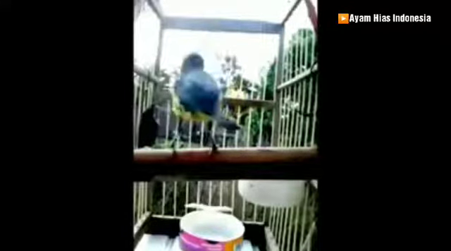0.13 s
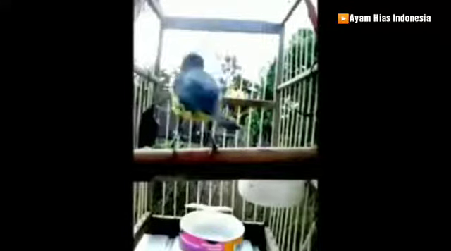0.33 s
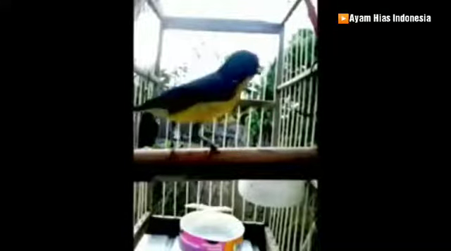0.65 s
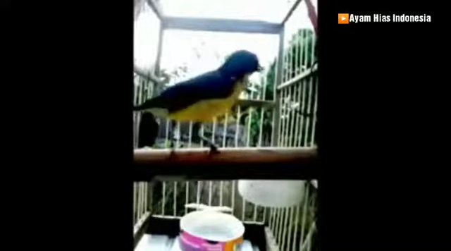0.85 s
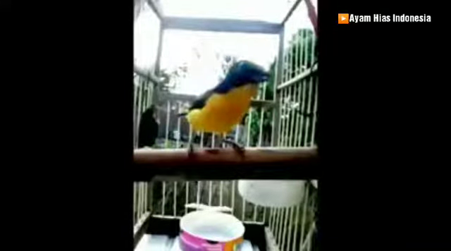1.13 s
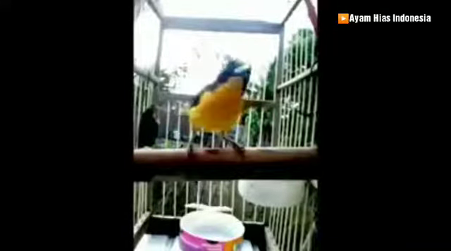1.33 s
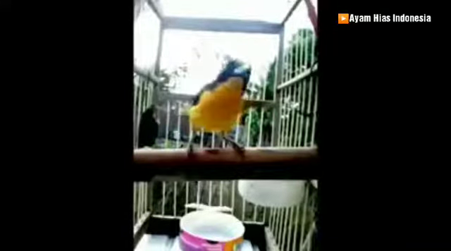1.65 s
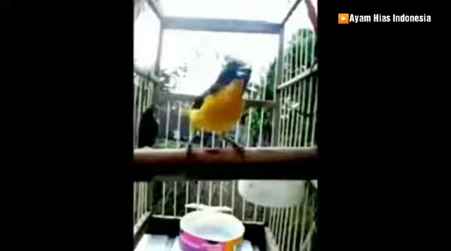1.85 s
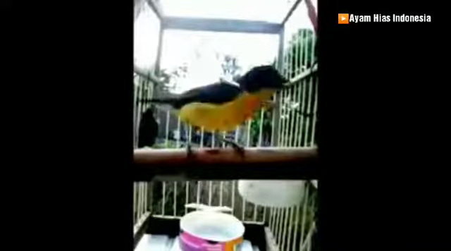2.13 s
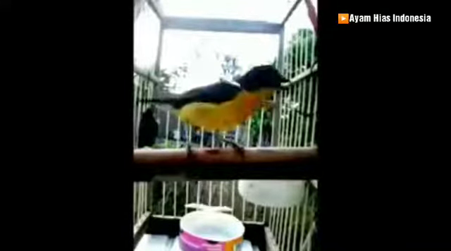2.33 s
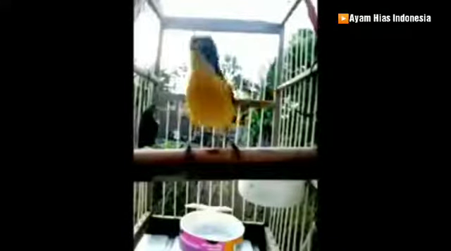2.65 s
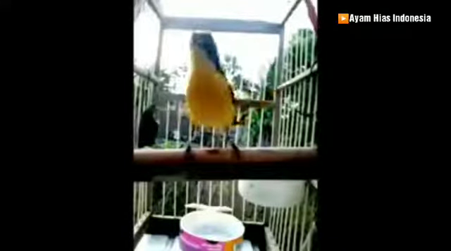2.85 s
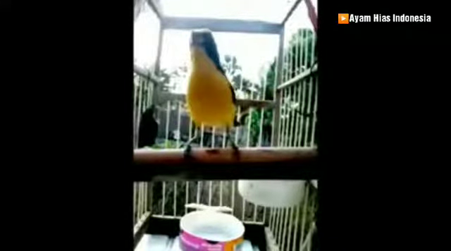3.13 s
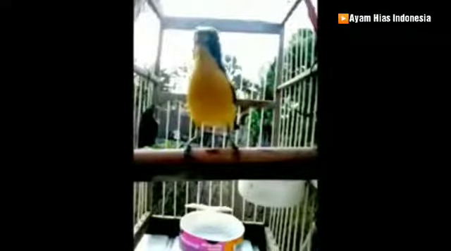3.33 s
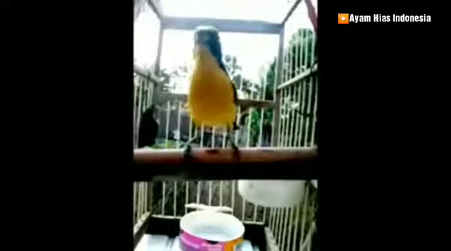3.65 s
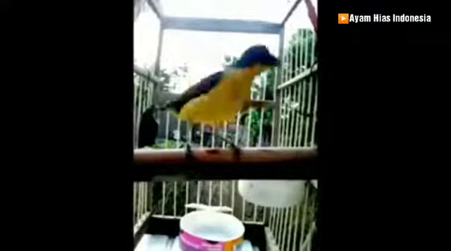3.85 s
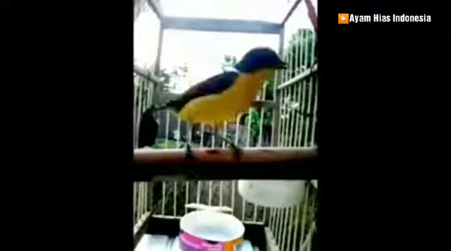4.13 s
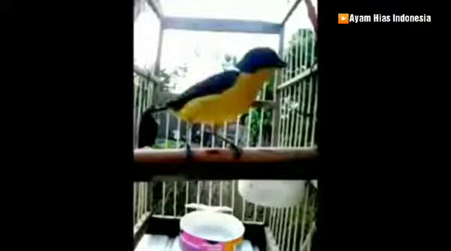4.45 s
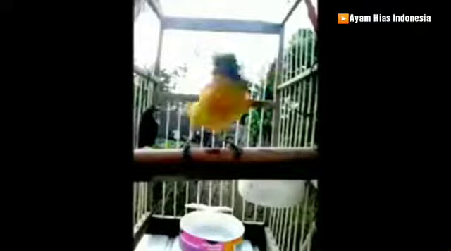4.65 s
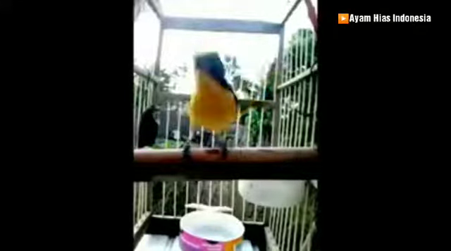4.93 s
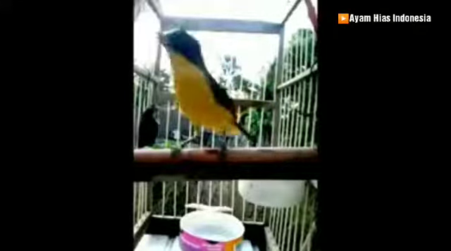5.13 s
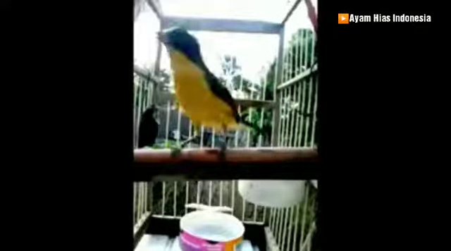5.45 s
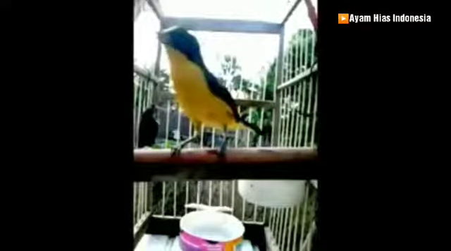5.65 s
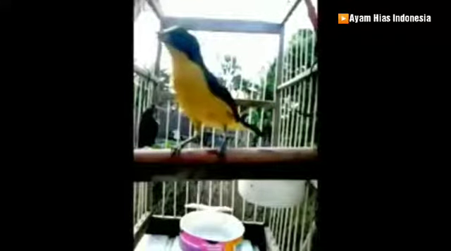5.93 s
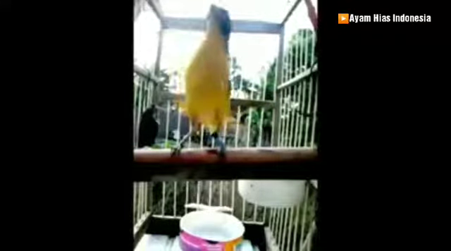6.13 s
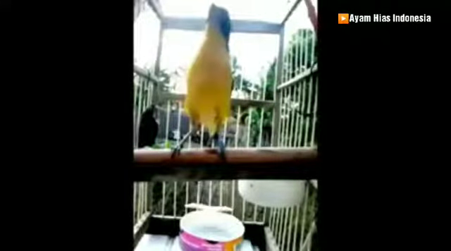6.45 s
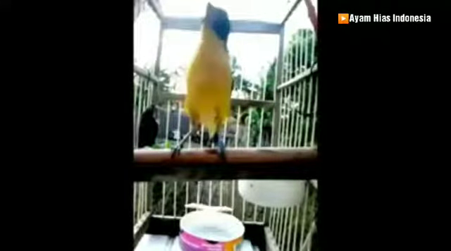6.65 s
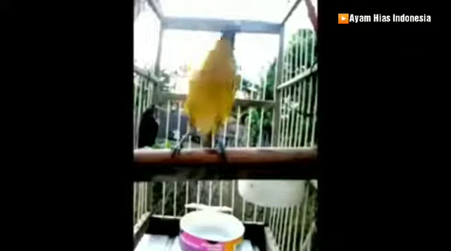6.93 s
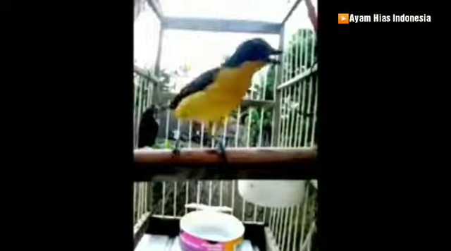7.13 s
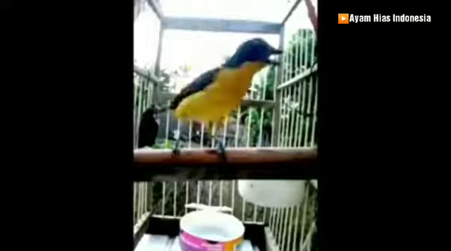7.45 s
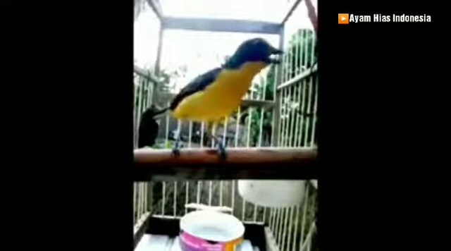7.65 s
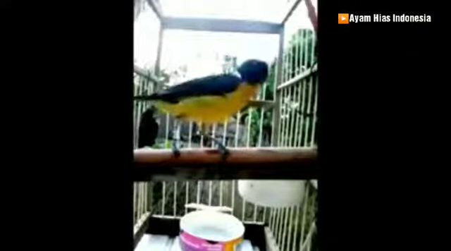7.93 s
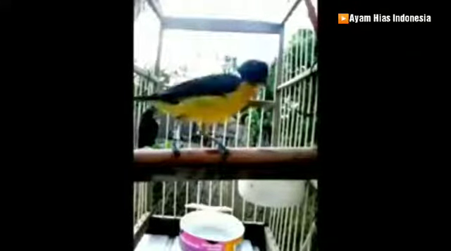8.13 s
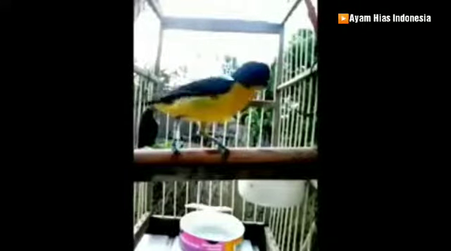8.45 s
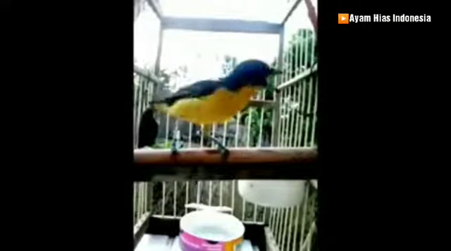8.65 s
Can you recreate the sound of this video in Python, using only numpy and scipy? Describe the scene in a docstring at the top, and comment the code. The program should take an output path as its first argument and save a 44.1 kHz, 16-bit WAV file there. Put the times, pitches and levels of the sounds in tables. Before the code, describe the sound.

A small songbird sings in a cage, close to the microphone, in a quiet yard. Four quick, bright chirps open the first half second. Three longer arched whistles with snapping edges follow at about 0.8, 1.3 and 2.1 seconds. Buzzy, pulsing churrs come from 2.5 to 3 seconds, then six nasal rising calls with whistled tips until 4.2, and a short rough warble. From 4.7 to 6.5 seconds the bird repeats a high, sharply peaked note in a fast chain. A brief twitter turns into a rapid, thin trill until 7.2 seconds. From there to about 8.8 seconds come harsh rasps, high fluttering buzzes and a couple of soft clucks. The cage and nearby walls add a short echo. Behind the song there is only very faint outdoor air and a few barely audible low bumps, the clearest near 7.8 seconds.

```python
'''Caged songbird, close up

A small songbird sings on its perch, close to the microphone, in a quiet yard. Chirps and slurred
whistles lead to nasal rising calls, a chain of peaked notes, a trill and harsh rasps. The two sides
of its syrinx sound alone or together, in near sines or with the overtones of slapping membranes.
The cage and nearby walls add a short echo; faint air and three low bumps lie behind.'''
import sys
import numpy as np
from scipy import signal
from scipy.fft import rfft, irfft
from scipy.io import wavfile
from scipy.ndimage import uniform_filter1d, minimum_filter1d

SR = 44100
rng = np.random.default_rng(int(sys.argv[2]) if len(sys.argv) > 2 else 0)


def generate_wav(sig):
    """Save sig (samples, or channels by samples) to the path in sys.argv[1] as 16-bit PCM at SR."""
    pcm = np.round(np.clip(np.atleast_2d(sig).T, -1, 1) * 32767).astype(np.int16)
    wavfile.write(sys.argv[1], SR, pcm)


N = 387198
TIME = np.arange(N) / SR
CUTOFF_HZ = 15700

# opening chirps from the perch: (time [s], length [s], from [Hz], to [Hz], level [dB])
SCOOP_CHIRPS = [(-.068, 0.087, 5430, 5100, -0.5), (0.115, 0.092, 5420, 5290, -1),
                (0.324, 0.097, 5220, 5370, 0), (0.464, 0.082, 5274, 5203, 0.5)]
# their upper voice: (share of length, pitch ratio, level [dB])
SCOOP_UPPER_SHAPE = [(0, 1, -11), (.13, 1.14, -7.5), (.3, 1.04, -7.5), (.55, .97, -10), (.85, 1.01, -5),
                     (1, 1.04, -15)]
# their lower voice: (share of length, pitch ratio, harmonics 1, 2, 3 [dB], roughness)
SCOOP_LOWER_SHAPE = [(-.03, .67, -27.5, -46, -54.5, 0.1), (.1, .65, -26, -48, -48, 0.07),
                     (.27, .555, -35, -22, -36.5, .05), (.44, .56, -27, -16.5, -44.5, .06),
                     (.68, .665, -22.5, -57.5, -45, .05), (1, .78, -26.5, -30.5, -63.5, .1)]

def scoops():
    """Two-voiced chirps, both sides of the syrinx at once: the clear notes, then the rich ones."""
    upper = [note(SCOOP_UPPER_SHAPE, *row) for row in SCOOP_CHIRPS]
    lower = [note(SCOOP_LOWER_SHAPE, *row) for row in SCOOP_CHIRPS]
    return upper, lower


# long arched whistles: (time [s], length [s], top [Hz], tone level [dB], snap level [dB])
ARCHED_WHISTLES = [(.822, .238, 3365, 1, 1), (1.299, .236, 3420, .5, 3), (2.088, .27, 3315, -2, -4)]
# a pure tone between two harsh snaps: (share of length, harmonics 1, 2, 3 [dB], roughness)
ARCH_SHAPE = [(0, -42, -40.5, -28, .55), (.06, -41.5, -13, -33, .42), (.13, -32.5, -12, -47.5, .33),
              (0.218, -21, -20, -39.5, .12), (.32, -15.5, -38.5, -51.5, .03), (.57, -11, -44, -45.5, 0.04),
              (.82, -12.5, -44.5, -52.5, .02), (.9, -14, -51, -61.5, 0.17), (.945, -30, -14.5, -46, 0.46),
              (0.999, -39.5, -29.5, -39, 0.29)]

def arch(start, length, top_hz, tone_db, snap_db):
    """The pitch snaps up, bows and snaps down; the fundamental carries the tone, overtones the snaps."""
    up_s, down_s, snap_depth, bow_depth = .021, .008, .6, .03
    u = np.linspace(0, 1, 120)
    share, *columns = np.transpose(ARCH_SHAPE)
    first, second, third, rough = [np.interp(u, np.sort(share), c) for c in columns]
    snaps = np.exp(-u * length / up_s) + np.exp(-((1 - u) * length / down_s) ** 2 / 2)
    rough *= np.tanh(snaps / .04)  # the held tone stays pure
    hz = top_hz * (1 - snap_depth * snaps - bow_depth * (2 * u - 1) ** 2)
    levels = first + tone_db, second + snap_db, third + snap_db
    return np.column_stack([start + u * length, hz, *levels, rough])


# nasal rising calls: (time [s], rise [s], from [Hz], to [Hz], early level [dB], late level [dB],
# tip length [s], tip pitch [Hz], tip level [dB])
RISING_CALLS = [(3.054, .17, 1438, 2296, -1.5, 7.5, 0.031, 3060, -4),
                (3.324, 0.068, 1644, 2204, -1, 0, 0.056, 3074, 1),
                (3.502, 0.048, 1662, 2206, 2.5, -7, 0.055, 2890, -2.5),
                (3.669, 0.082, 1820, 2176, -1.5, -1, 0.087, 2792, -1),
                (3.892, 0.057, 1744, 2230, -3, -1.5, 0.065, 2930, 0),
                (4.078, 0.067, 1580, 2296, -4, -3.5, 0.062, 2796, -3.5)]
# the rise, then the tip: (share of length, pitch ratio, harmonics 1, 2, 3 [dB], roughness)
RISE_SHAPE = [(0, 1, -37, -36, -56, .15), (.25, 1, -35, -23, -39, .03), (.65, 1, -35, -22, -38, .09),
              (1, 1, -40, -31, -47, .18)]
TIP_SHAPE = [(.15, .94, -25, -53, -44, 0.11), (.42, 0.97, -13, -32.5, -47, 0),
             (.72, .92, -21, -40, -50.5, .04), (1, .85, -41, -32.5, -37.5, 0.35)]

def riser(start, rise_s, from_hz, to_hz, early_db, late_db, tip_s, tip_hz, tip_db):
    """A nasal glide runs straight on into its whistled tip."""
    swell_db = early_db + (late_db - early_db) * np.array(RISE_SHAPE)[:, :1]
    rise = note(RISE_SHAPE, start, rise_s, from_hz, to_hz, swell_db)
    tip = note(TIP_SHAPE, start + rise_s, tip_s, tip_hz, tip_hz, tip_db)
    return np.vstack([rise, tip])


# the chain of peaked notes: (time [s], peak time [s], climb [s], fall [s], hook [Hz], dip [Hz],
# peak [Hz], end [Hz], hook [dB], mid-climb [dB], top of climb [dB], fall [dB])
PEAKED_NOTES = [(4.721, 4.786, 0.023, .036, 3825, 2990, 6140, 3630, -24.5, -14.5, -2, -8.5),
                (4.874, 4.95, 0.042, 0.042, 3636, 3530, 6400, 4195, -21, -9, -8, -9.5),
                (5.014, 5.071, 0.039, 0.039, 3755, 3485, 6260, 3670, -20, -7.5, -5.5, -7.5),
                (5.14, 5.206, 0.033, 0.037, 3840, 3380, 6620, 3830, -16.5, -12, -21, -8),
                (5.288, 5.362, 0.053, 0.029, 3700, 3220, 6350, 3555, -18, -8.5, -8.5, -8.5),
                (5.445, 5.521, .05, .027, 3750, 2940, 5960, 3950, -20, -14.5, -26, -8),
                (5.603, 5.674, 0.063, 0.027, 3430, 3257, 5880, 3446, -15, -9.5, -3, -9),
                (5.784, 5.845, .032, 0.034, 3752, 3640, 6060, 3925, -17.5, -17.5, 0.5, -11.5),
                (5.964, 6.034, 0.053, 0.038, 3646, 3042, 5680, 3080, -13.5, -11, -11.5, -9),
                (6.12, 6.199, 0.042, 0.034, 3810, 3265, 6060, 3600, -17, -6.5, -8, -10.5),
                (6.363, 6.452, 0.057, 0.036, 3510, 3167, 5600, 4230, -17, -16, -10, -10)]
# how the throat favours the pitches they sweep through: (frequency [Hz], gain [dB])
PEAKED_RESONANCES = [(3200, 1), (4000, 4), (4700, -4.5), (5400, 3), (6000, -4.5), (6700, -5)]

def peaked_note(start, peak_s, climb_s, fall_s, hook_hz, dip_hz, peak_hz, end_hz,
                hook_db, mid_db, top_db, fall_db):
    """After a soft hook and a dip the pitch climbs ever faster, then falls as the note fades."""
    hook_s, hook_edge_db, dip_db, fade_db = .0091, -10.5, -29.5, 12.5
    u = np.linspace(0, 1, 20)
    hook = [(start, hook_hz * .88, hook_db + hook_edge_db),
            (start + hook_s, hook_hz, hook_db),
            (start + 2 * hook_s, (hook_hz + dip_hz) / 2, hook_db + hook_edge_db)]
    climb_db = np.interp(u, [0, .7, 1], [dip_db, mid_db, top_db])
    climb = [peak_s - climb_s * (1 - u), dip_hz + (peak_hz - dip_hz) * u ** 2.1, climb_db]
    fall = [peak_s + fall_s * u, peak_hz + (end_hz - peak_hz) * u ** .9, fall_db - fade_db * u ** 3]
    s, hz, db = np.hstack([climb, fall])
    return np.vstack([hook, np.column_stack([s, hz, db + at_hz(PEAKED_RESONANCES, hz)])])


# clear downward slurs: (time [s], length [s], from [Hz], to [Hz], level [dB])
DOWN_SLURS = [(4.968, .02, 5350, 4490, -15), (5.103, 0.015, 5400, 4940, -16),
              (5.374, 0.017, 5500, 4160, -14), (5.53, 0.014, 5100, 4600, -32),
              (5.689, 0.017, 5550, 4700, -5), (5.861, .016, 5664, 5220, -4.5),
              (6.053, .022, 5450, 4230, -14.5), (6.211, 0.031, 5410, 4540, -8.5),
              (6.242, 0.0038, 5240, 5280, -3.5), (7.973, 0.075, 5920, 4120, -16.5)]

def slurs(fade_db):
    """Straight, fading falls, most from the other side of the syrinx as a peaked note comes down."""
    return [[(s, high, db), (s + length, low, db - fade_db)] for s, length, high, low, db in DOWN_SLURS]


# buzzy, warbled and harsh calls, one list per call:
# (time [s], pitch [Hz], level [dB], extra from the third harmonic up [dB], roughness)
CHURR_CALLS = [
    [(2.488, 1570, -31.5, 1, 0.31), (2.505, 1743, -12, -0.5, 0), (2.555, 1921, -12.5, 9, 0.01),
     (2.59, 1697, -29.5, 6.5, 0.28), (2.62, 1684, -16.5, -2.5, 0), (2.65, 1842, -22.5, -3, 0.08),
     (2.728, 1744, -22.5, -6, 0.39), (2.758, 1570, -40, -4, 1.1)],
    [(2.823, 1388, -29, -23, 0.24), (2.87, 1603, -15, -19.5, 0), (2.915, 1816, -4.5, -15, 0),
     (2.982, 1654, -29, 7.5, 0.54)],
    [(4.275, 1452, -31.5, -10.5, 0.4), (4.305, 1810, -17, -13.5, 0.15), (4.345, 2097, -14.5, 0, 0.11),
     (4.37, 2878, -15.5, 7.5, .06), (4.402, 3072, -13.5, 1, 0.11), (4.445, 1947, -18.5, 2.5, 0.24),
     (4.478, 1400, -28.5, 3, 0.48), (4.51, 1530, -21.5, 1.5, 0.17), (4.532, 2220, -13.5, -3, 0.38),
     (4.548, 3170, -13.5, -4, .1), (4.57, 3650, -9.5, -11, 0.27), (4.6, 2614, -11.5, 8, 0.06),
     (4.645, 1843, -18, 4, 0.2), (4.664, 1486, -35, -3, 0.51)],
    [(7.462, 1880, -43, 4, 0.7), (7.49, 1750, -25.5, -11, 0.88), (7.52, 1508, -25, -13, 0.62),
     (7.62, 1940, -19.5, -0.5, 0.41), (7.645, 2108, -35, 8, 0.48)],
    [(8.545, 1449, -28.5, -7, 0.63), (8.572, 1732, -29.5, 1, 0.44), (8.63, 2153, -17.5, -2, 0.88),
     (8.69, 2000, -33, -20, 0.7), (8.779, 1823, -28.5, 0, 0.96)],
]
# throat resonances in those calls: (frequency [Hz], gain [dB])
CHURR_RESONANCES = [(1500, -15.5), (2400, -28.5), (3000, -11.5), (3600, -9), (4400, -5.5), (5400, -1),
                    (6000, -12), (7000, -37), (10000, -27)]

def churr(rows):
    """Each harmonic rings out as it passes a throat resonance."""
    times, *columns = np.transpose(rows)
    s = np.linspace(times.min(), times.max(), 100)
    hz, db, extra_db, rough = [np.interp(s, np.sort(times), c) for c in columns]
    first, second, third = [db + at_hz(CHURR_RESONANCES, k * hz) for k in (1, 2, 3)]
    return np.column_stack([s, hz, first, second, third + extra_db, rough])


# low clucks late in the song: (time [s], length [s], pitch [Hz], level [dB])
LOW_CLUCKS = [(7.316, .06, 1576, 0), (8.156, 0.096, 1335, -4)]
# their shape: (share of length, pitch ratio, harmonics 1, 2, 3 [dB], roughness)
CLUCK_SHAPE = [(0, .7, -49, -52, -51.5, .5), (.38, 0.97, -25.5, -44.5, -33.5, 0.27),
               (1, .68, -54.5, -64.5, -59.5, .35)]

def clucks():
    """Short rough notes that rise and drop back in pitch and level."""
    return [note(CLUCK_SHAPE, s, length, hz, hz, db) for s, length, hz, db in LOW_CLUCKS]


# a quick twitter before the trill: (time [s], pitch [Hz], level [dB])
TWITTER_CONTOUR = [(6.568, 5380, -15), (6.581, 7460, -17.5), (6.587, 5870, -10.5), (6.597, 5390, -17),
                   (6.607, 6480, 0), (6.614, 6320, -31.5), (6.623, 6560, -16.5), (6.634, 5940, -8.5)]

def song_notes():
    """Contours of the near-sine notes, twitter included, and of the calls rich in overtones."""
    clear, rich = scoops()
    clear += [peaked_note(*row) for row in PEAKED_NOTES] + [TWITTER_CONTOUR]
    rich += [arch(*row) for row in ARCHED_WHISTLES] + [riser(*row) for row in RISING_CALLS]
    rich += clucks() + [churr(rows) for rows in CHURR_CALLS]
    return clear, rich


# upward flicks of the trill: (time [s], top [Hz], level [dB])
TRILL_FLICKS = [(6.743, 6340, -4), (6.757, 6380, -12), (6.772, 6640, -7), (6.803, 6730, -6.5),
                (6.843, 7210, -7.5), (6.868, 7170, -9), (6.906, 7260, 1), (6.941, 6580, -3.5),
                (6.974, 7230, -3), (7.008, 6750, -6), (7.044, 6570, -3), (7.077, 6500, -4),
                (7.112, 6350, -6.5), (7.149, 6380, -5.5), (7.183, 6470, -6)]
# one flick: (share of length, pitch ratio, level [dB])
FLICK_SHAPE = [(0, 0.997, -1.5), (.5, 1.005, -0.5), (1, 1, -6.5)]

def trill():
    """Quick upward sweeps; as the trill runs on they lengthen and their starting pitch settles."""
    first_length_s, settle_s = .0098, .17
    flicks = []
    for s, top_hz, db in TRILL_FLICKS:
        age = s - TRILL_FLICKS[0][0]
        low_hz = 5100 + 775 * np.exp(-age / settle_s)
        flicks.append(note(FLICK_SHAPE, s, first_length_s + .02 * age, low_hz, top_hz, db))
    return whistles(flicks, jitter=.00057, shimmer_db=1, overtone_db=-21)


# high fluttering notes and ticks: (time [s], length [s], from [Hz], to [Hz], level [dB])
HIGH_BUZZES = [(6.577, 0.01, 8400, 8200, -13), (6.634, 0.02, 8040, 7320, -6.5),
               (6.66, 0.046, 7210, 7360, -8.5), (6.747, 0.025, 7780, 7330, -12.5),
               (6.771, 0.028, 7190, 7390, -6), (6.781, .038, 7900, 7250, -8),
               (6.843, .014, 7700, 7500, -9.5), (6.862, 0.026, 6830, 7230, -3.5),
               (7.606, 0.051, 7570, 8210, -13), (7.644, 0.15, 8340, 10100, -15.5),
               (7.638, 0.13, 3870, 4890, -22.5), (7.748, 0.054, 4980, 5320, -12),
               (7.886, .04, 8200, 7070, -10.5), (7.924, 0.043, 6990, 6270, -11.5),
               (8, 0.046, 6390, 4740, -14), (8.315, 0.054, 7960, 8170, -13),
               (8.311, .055, 9960, 10340, -18), (8.408, 0.044, 7850, 7900, -8.5),
               (8.409, 0.041, 10250, 10850, -13.5), (8.318, 0.032, 2950, 2920, -39),
               (8.412, 0.034, 2990, 3003, -39), (8.413, .035, 4660, 4900, -34.5)]
# each swells and fades: (share of length, pitch ratio, level [dB])
BUZZ_SHAPE = [(0, 1, -9.5), (.36, 0.99, -2.5), (1, 1, -12)]

def buzzes(flutter_hz, swing, jitter, shimmer_db, ragged_after_s):
    """High notes whose pitch and strength flutter quickly and unevenly; long ones turn ragged."""
    out = np.zeros(N)
    for row in HIGH_BUZZES:
        at, gate, (hz, db) = syllable(note(BUZZ_SHAPE, *row))
        ragged = 1 + (len(at) / SR / ragged_after_s) ** 2
        flutter = np.sin(phase_of(flutter_hz * (1 + .44 * wobble(50, len(at)))))
        strength = unit_rms(from_db(shimmer_db * (flutter + wobble(280, len(at)))))
        tone = clear_tone(hz * (1 + swing * flutter), jitter * ragged, overtone_db=-10.5)
        out[at] += gate * from_db(db) * strength * tone
    return out


def whistles(notes, jitter, shimmer_db, overtone_db):
    """One side of the syrinx glides through each note."""
    out = np.zeros(N)
    for rows in notes:
        at, gate, (hz, db) = syllable(rows)
        level = from_db(db + shimmer_db * wobble(120, len(at)))
        out[at] += gate * level * clear_tone(hz, jitter, overtone_db)
    return out


# how throat and beak pass overtones on to the microphone: (frequency [Hz], gain [dB])
BEAK_RESPONSE = [(3000, 2), (5500, 10.5), (7500, -10), (9500, -13), (11300, -13), (12500, -11.5),
                 (16000, -28)]

def clear_tone(hz, jitter, overtone_db):
    """A near sine with a weak octave; it trembles more while it glides."""
    phase = phase_of(hz * (1 + jitter * (.5 + 2 * unrest(hz)) * wobble(480, len(hz))))
    octave = from_db(overtone_db + at_hz(BEAK_RESPONSE, 2 * hz)) * (2 * hz < CUTOFF_HZ)
    return np.sqrt(2) * (np.sin(phase) + octave * np.sin(2 * phase))


def nasal_calls(notes, tremor, chaos, shake, scatter, fray, hiss_db, rough_hiss_db):
    """Membranes slap shut and make overtones; when rough, they beat irregularly and the hiss grows."""
    voice, hiss_gain = np.zeros(N), np.zeros(N)
    for rows in notes:
        at, gate, (hz, first_db, second_db, third_db, rough) = syllable(rows)
        size = len(at)
        rough = np.clip(np.maximum(rough, .23 * unrest(hz)), 0, 1)
        phase = phase_of(hz * (1 + tremor * wobble(150, size) + chaos * rough * wobble(450, size)))
        strength = np.sqrt(2) * gate * unit_rms(1 + shake * rough * wobble(1100, size))
        hiss_gain[at] = from_db(hiss_db) + from_db(rough_hiss_db) * np.tanh(2 * rough)
        for k in range(1, 7):
            beak_db = at_hz(BEAK_RESPONSE, k * hz) - at_hz(BEAK_RESPONSE, 3 * hz)
            db = first_db if k == 1 else second_db if k == 2 else third_db + beak_db - 1.4 * (k - 3)
            # high overtones fray first
            blur = (scatter * rough + 2 * rough ** 3 + fray * (k - 1) * hz / SR) * wobble(630, size)
            voice[at] += strength * from_db(db) * (k * hz < CUTOFF_HZ) * np.sin(k * phase + blur)
    return voice + hiss(voice * hiss_gain, HISS_SPECTRUM)


# hoarse noise in the harshest calls and onsets, one list per call: (time [s], level [dB])
RASP_ENVELOPES = [
    [(1.303, -35), (1.314, -25.5), (1.35, -43)],
    [(2.58, -38), (2.62, -22), (2.72, -21.5), (2.757, -42)],
    [(2.905, -62), (2.95, -20), (2.985, -46)],
    [(5.45, -57), (5.475, -42), (5.5, -34)],
    [(6.36, -63), (6.385, -48.5), (6.43, -44)],
    [(7.463, -43), (7.485, -26), (7.52, -16.5), (7.535, -29.5), (7.6, -14), (7.66, -38), (7.8, -35),
     (7.82, -67)],
    [(8.55, -45.5), (8.59, -25), (8.625, -18), (8.66, -15.5), (8.7, -22.5), (8.779, -18.5)],
]
# its colour: (frequency [Hz], density [dB])
RASP_SPECTRUM = [(700, -24), (1500, -79), (3000, -9.5), (5000, 0), (6500, 7.5), (7800, 15.5), (9000, 3),
                 (11300, -5.5), (12500, -1), (16000, -28)]

def rasps(grain_hz, grain_db):
    """Chaotic vibration gives grainy noise, shaped by throat and beak."""
    level = np.zeros(N)
    for rows in RASP_ENVELOPES:
        at, gate, (db,) = syllable(rows)
        level[at] += gate * from_db(db)
    grains = rng.standard_normal(N) * from_db(grain_db * wobble(grain_hz, N))
    return level * coloured(grains, RASP_SPECTRUM)


# calls that break into pulses: (first pulse [s], end [s], rate [Hz], swing either way [dB])
PULSED_SPANS = [(2.561, 2.768, 67, 7.5), (2.914, 2.974, 44.6, 4)]

def throb():
    """Gain of the fast pulsing that ends two of the calls."""
    gain = np.ones(N)
    for start, end, rate_hz, swing_db in PULSED_SPANS:
        at = (TIME > start - 1 / rate_hz) & (TIME < end)
        phase = 2 * np.pi * rate_hz * (TIME[at] - start) + wobble(rate_hz / 2, at.sum())
        gain[at] = unit_rms(from_db(swing_db * np.cos(phase)))
    return uniform_filter1d(gain, size=88)


# soft hiss around the notes: (frequency [Hz], density [dB])
HISS_SPECTRUM = [(1500, -52), (2400, -30.5), (3200, -2), (5500, 14.5), (6300, 6), (7000, -20.5),
                 (8400, -8.5), (11200, -18), (16000, -40)]
# dry rustle inside the highest notes: (frequency [Hz], density [dB])
RUSTLE_SPECTRUM = [(1100, -22), (1900, -7.5), (4500, 2), (7500, 9), (11000, -5.5), (16000, -25)]

def hiss(voice, spectrum):
    """Soft hiss around the notes that swells and fades with the voice."""
    power = uniform_filter1d(uniform_filter1d(voice ** 2, size=440), size=660)
    return np.sqrt(np.maximum(power, 0)) * coloured(rng.standard_normal(N), spectrum)


def band_limit(x, low_hz, top_hz):
    """The song has no bass, and its treble is cut steeply above top_hz."""
    for _ in range(5):
        x = signal.sosfilt(signal.butter(2, low_hz, "high", fs=SR, output="sos"), x)
    return signal.sosfilt(signal.butter(10, top_hz, fs=SR, output="sos"), x)


# colour of what the cage and nearby walls send back: (frequency [Hz], gain [dB])
ECHO_SPECTRUM = [(200, -22), (1500, 4.5), (5500, -1.5), (9000, 4), (16000, 0.5)]

def echo(x, delay_s, t60_s, side_db):
    """Dense reflections that die away; side_db sets their stereo width."""
    size = SR // 2
    age = TIME[:size] - delay_s
    decay = (age > 0) * from_db(-60 * np.maximum(age, 0) / t60_s)
    tails = [coloured(rng.standard_normal(size), ECHO_SPECTRUM) * decay for _ in range(2)]
    mid, side = [signal.fftconvolve(x, unit_rms(tail) / np.sqrt(size))[:N] for tail in tails]
    return mid + from_db(side_db) * side * np.array([[1], [-1]])


# soft bumps in the background: (time [s], width [s], pitch [Hz], level [dB])
LOW_BUMPS = [(0.448, 0.013, 292, -66), (7.34, 0.017, 157.1, -61), (7.755, 0.042, 195, -51)]

def bumps():
    """Dull, faint swells far below the song."""
    out = np.zeros(N)
    for s, width, hz, db in LOW_BUMPS:
        swell = from_db(db) * np.exp(-((TIME - s) / width) ** 2)
        out += swell * np.sqrt(2) * np.sin(phase_of(hz * (1 + .1 * wobble(60, N))))
    return out


# the yard around the cage: (frequency [Hz], density [dB])
YARD_SPECTRUM = [(30, 4.5), (400, -4), (5000, -13), (16000, -34.5)]

def yard_air():
    """Steady outdoor air, strongest in the bass."""
    return coloured(rng.standard_normal(N), YARD_SPECTRUM)


def note(shape, start, length, from_hz, to_hz, db):
    """Lay a shape over a note's time, glide and level: rows of (time [s], pitch [Hz], level [dB], ..)."""
    rows = np.array(shape, float)
    share = rows[:, 0]
    hz = rows[:, 1] * (from_hz + (to_hz - from_hz) * share)
    return np.column_stack([start + length * share, hz, rows[:, 2:5] + db, rows[:, 5:]])


def syllable(rows, edge_s=.004):
    """Sample indices of a syllable, its soft on-off gate and its gliding controls."""
    s, *columns = np.transpose(rows)
    at = np.arange(max(0, int((s.min() - edge_s) * SR)), min(N, int((s.max() + edge_s) * SR)))
    inside = np.minimum(TIME[at] - s.min(), s.max() - TIME[at])
    gate = np.sin(np.pi / 2 * np.clip((inside / edge_s + 1) / 2, 0, 1)) ** 2
    controls = [np.interp(TIME[at], np.sort(s), c) for c in columns]
    return at, gate, [uniform_filter1d(c, size=101, mode="nearest") for c in controls]


def unrest(hz):
    """0 on a held pitch, near 1 in the fastest glides, where the vibration turns unsteady."""
    return np.tanh(np.abs(np.gradient(np.log(hz))) * SR / 20)


def phase_of(hz):
    """Phase of a vibration that follows a pitch curve."""
    return 2 * np.pi * (np.cumsum(hz) / SR + rng.random())


def wobble(rate_hz, size):
    """Random wavering up to the given rate, spread 1."""
    low = signal.butter(2, min(rate_hz, SR / 4), fs=SR, output="sos")
    return unit_rms(signal.sosfilt(low, rng.standard_normal(size + SR // 10)))[-size:]


def coloured(noise, spectrum):
    """Give noise a spectrum, at unit power."""
    hz = np.fft.rfftfreq(len(noise), 1 / SR)
    return unit_rms(irfft(rfft(noise) * from_db(at_hz(spectrum, hz)), len(noise)))


def at_hz(spectrum, hz):
    """Read a spectrum on a log-frequency axis."""
    freq, db = np.transpose(spectrum)
    return np.interp(np.log(np.maximum(hz, 1)), np.log(freq), db)


def unit_rms(x):
    """Scale to unit power."""
    return x / np.sqrt(np.mean(x ** 2) + 1e-20)


def from_db(db):
    """Decibels to gain."""
    return 10 ** (np.asarray(db) / 20)


def scene():
    """The bird close and centred, reflections from cage and walls around it, the quiet yard behind."""
    clear_notes, rich_notes = song_notes()
    clear = from_db(-2.5) * whistles(clear_notes, jitter=.012, shimmer_db=2.5, overtone_db=-21.5)
    clear += from_db(-.5) * whistles(slurs(fade_db=12), jitter=.0223, shimmer_db=3, overtone_db=-15.5)
    high = from_db(-1) * trill()
    high += from_db(.73) * buzzes(flutter_hz=123.1, swing=.032, jitter=.015, shimmer_db=2.5,
                                  ragged_after_s=.1)
    nasal = from_db(-1) * nasal_calls(rich_notes, tremor=.0064, chaos=.1, shake=.058, scatter=.56,
                                      fray=1.1, hiss_db=-54, rough_hiss_db=-4)
    hoarse = from_db(-1) * rasps(grain_hz=500, grain_db=2.5)
    soft_hiss = from_db(-14) * hiss(clear, HISS_SPECTRUM) + from_db(-28.5) * hiss(high, RUSTLE_SPECTRUM)
    song = band_limit(clear + high + soft_hiss + (nasal + hoarse) * throb(), low_hz=824, top_hz=11830)
    # close reflections overlap each fast glide with its own earlier pitches and thicken it
    cage = from_db(-9.5) * echo(song, delay_s=.003, t60_s=.095, side_db=-10)
    walls = from_db(-25) * echo(song, delay_s=.0047, t60_s=.24, side_db=-2)
    return song + cage + walls + bumps() + from_db(-83.5) * yard_air()


def record(dry):
    """The loudest peaks at the microphone are held down, what is still over clips; the top is cut."""
    ceiling = 1.1
    peak = -minimum_filter1d(-np.abs(dry).max(axis=0), size=132)
    gain = uniform_filter1d(1 / np.maximum(peak / ceiling, 1), size=132)
    top_cut = signal.cheby2(12, 70, CUTOFF_HZ, fs=SR, output="sos")
    return signal.sosfilt(top_cut, np.clip(dry * gain, -1, 1))


dry = scene()
out = record(dry)
generate_wav(out)
```